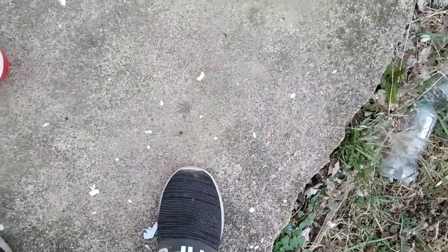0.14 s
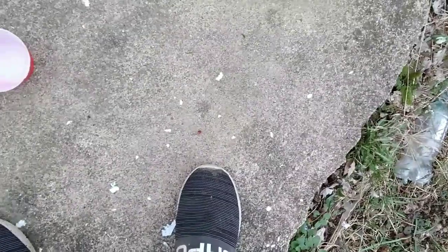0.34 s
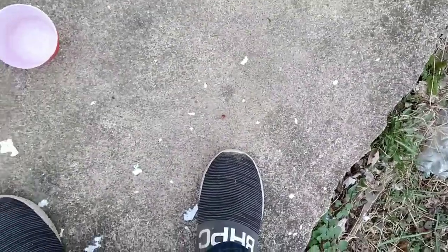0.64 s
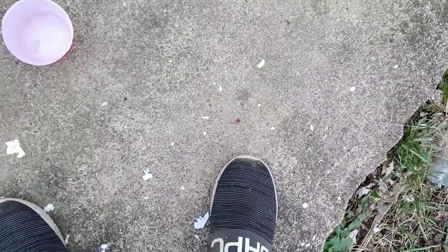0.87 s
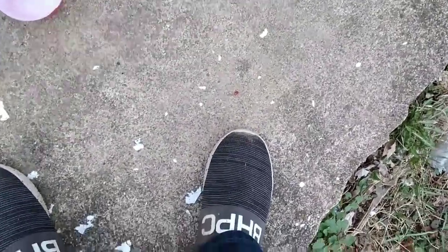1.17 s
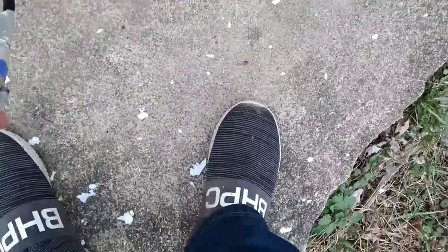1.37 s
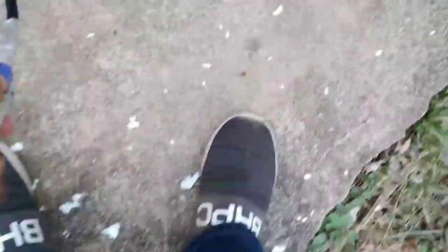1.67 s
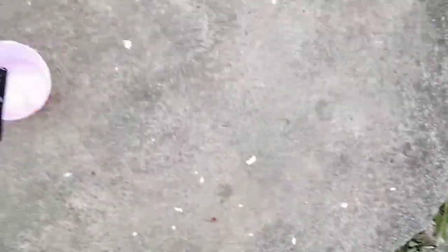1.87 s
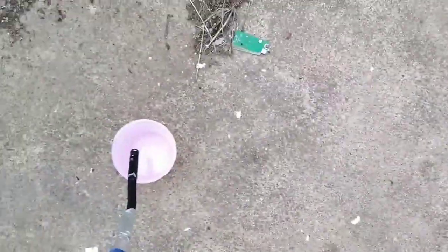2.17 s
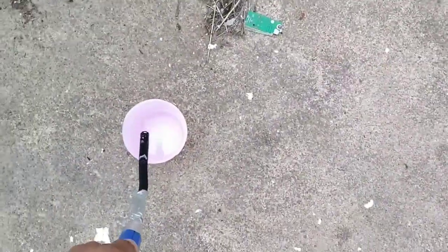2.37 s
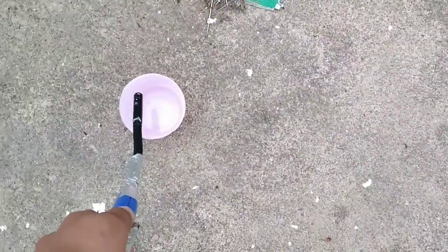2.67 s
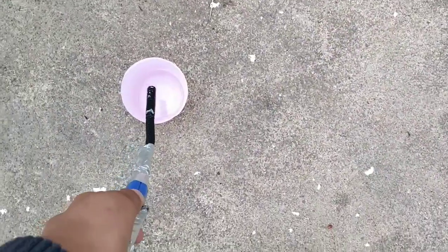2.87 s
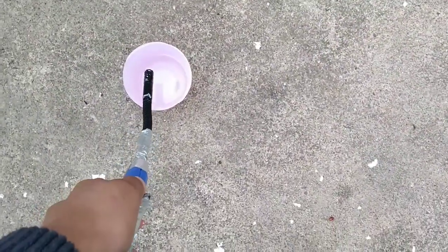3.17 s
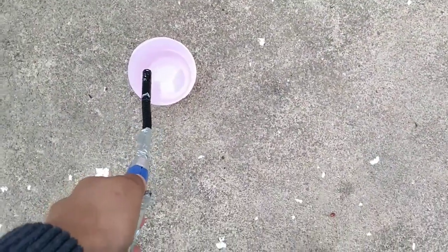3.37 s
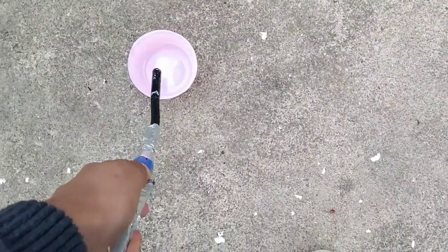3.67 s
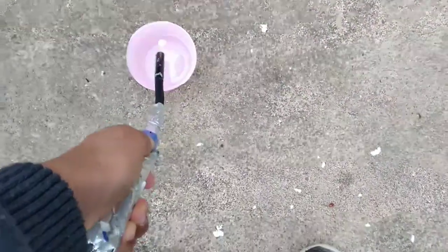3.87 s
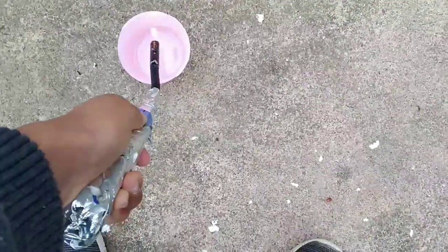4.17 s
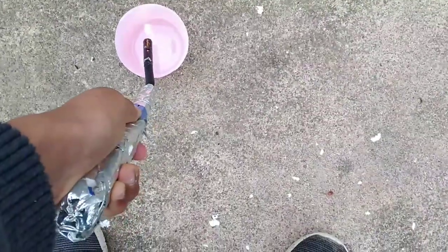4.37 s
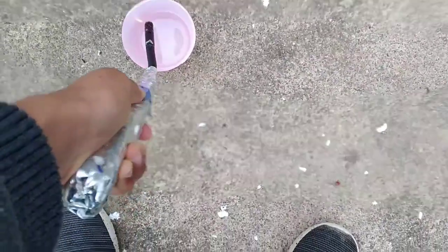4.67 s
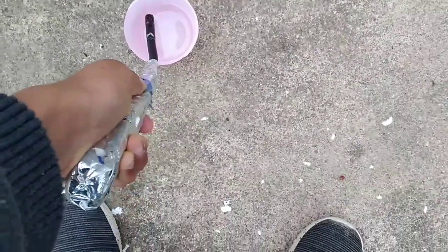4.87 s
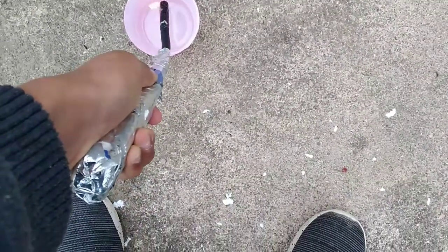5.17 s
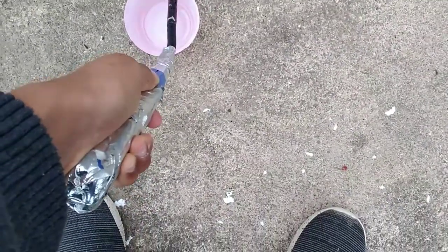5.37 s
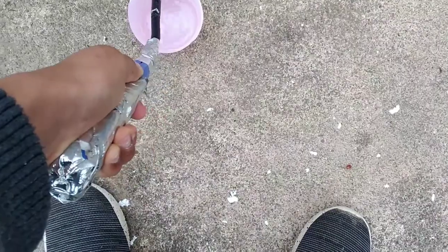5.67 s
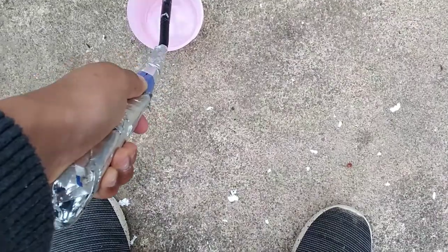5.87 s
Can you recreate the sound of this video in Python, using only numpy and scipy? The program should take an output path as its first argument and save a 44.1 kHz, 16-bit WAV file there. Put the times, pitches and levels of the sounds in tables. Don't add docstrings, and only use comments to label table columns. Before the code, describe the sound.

A close phone microphone in a paved yard between walls. From 0 s, low distant traffic rumbles under a soft car pass, strongest around 1 s and fading by about 3.5 s. Tiny ticks of trigger and foil appear, clearer near 1.1-1.3 s. At 1.5 s the igniter cracks hard and bright, with a brief metallic rattle and fluttering wall echoes; a weaker snap follows at 1.78 s, then light ticks around 1.9-2.0 s. The loudest snap comes at 2.42 s, repeated almost at once at 2.47 s. Trigger ticks lead to weak snaps at 2.98 and 3.11 s and a last strong one at 3.25 s. Dull little thumps of the jolted phone accompany several. Afterwards only faint rumble and barely audible insect and bird chirps remain, until dry foil crinkles from 5.54 to 5.8 s. The background is gated and muffled, the clicks crisp.

```python
import sys
import numpy as np
from scipy import signal
from scipy.fft import rfft, irfft, next_fast_len
from scipy.io import wavfile
from scipy.ndimage import uniform_filter1d, map_coordinates

SR = 44100
rng = np.random.default_rng(int(sys.argv[2]) if len(sys.argv) > 2 else 0)


def volts_from_decibels(level):
    exponent = np.asarray(level, float) / 20
    return 10 ** exponent


def store_pcm(level_fs):
    pcm = np.round(np.clip(level_fs, -1, 1) * 32767).astype(np.int16)
    wavfile.write(sys.argv[1], SR, np.atleast_2d(pcm).T)


N = 265923

# frequency in Hz, density in dB per Hz.
RUMBLE_HZ_DB = [(15, -56.5), (25, -34.5), (38, -19.5), (70, 0), (134, -3), (209, -5.5), (306, -11.5),
                (400, -28.5), (520, -57), (880, -120)]
DRONE_HZ_DB = [(150, -120), (250, -35), (380, 0), (550, -4.5), (720, -2.5), (900, -39), (1500, -120)]
ROAR_HZ_DB = [(300, -120), (600, -39), (740, -3), (900, 3), (1050, -3.5), (1300, -11.5), (1500, -47.5),
              (2500, -120)]
HISS_HZ_DB = [(600, -120), (1150, -33.5), (1400, 1.5), (2000, -6.5), (3000, -12), (4300, -28.5),
              (9000, -26.5), (11000, -46), (14000, -120)]
# frequency in Hz, density in dB per Hz.
STREET_HZ_DB = [(100, -100), (500, -99), (1000, -102), (2000, -108), (4000, -113), (8500, -113),
                (11000, -117), (14000, -122), (17000, -128)]
# time in seconds, exhaust level in dB, tyres in view in dB.
CAR = [(0, -62, -5), (.28, -64, -15), (.5, -57, -14), (.67, -54.5, -1), (.85, -50, -1.5), (1.09, -51, 2),
       (1.4, -58.5, -2.5), (1.7, -62, -1.5), (1.85, -55.5, 0.5), (2.12, -55, -6), (2.35, -61, -2.5),
       (2.57, -65.5, 8), (2.74, -62.5, 0.5), (3.07, -61.5, 7.5), (3.39, -67, 2.5), (3.63, -79, -2.5),
       (4.6, -72.5, -6.5), (4.9, -89.5, -4.5)]
# time in seconds, engine rumble in dB.
ROAD = [(0, -51.5), (.48, -44), (2.0, -48.5), (3.2, -54.5), (3.63, -47.5), (3.9, -48), (4.1, -52.5),
        (4.5, -52), (4.72, -50.5), (4.9, -52), (5.02, -49), (5.14, -53), (5.35, -48.5), (5.64, -47),
        (5.8, -47.5), (6.03, -47.5)]
# mean in dB, swing over the car's level in dB/dB, share of tyre view in dB/dB.
CAR_PARTS = [
    (-51.5, 0.42, 0.01),
    (-58, 1.01, 0.01),
    (-58, 0.67, 0.39),
    (-65, 0.44, 1.2),
]
# mean in dB, swing over the road's level in dB/dB.
ROAD_PARTS = [
    (-51, 0.69),
    (-89, 0.4),
    (-65.5, 1.6),
    (-81.5, 2.2),
]
CAR_MEAN_DB, ROAD_MEAN_DB = -58, -50
DRIFT_DB, DRIFT_PER_S = 1, 5.4

# start in seconds, peak in dB, rattle in
# ms, pitch in Hz, wall echo in dB.
TICKS = [(0.0024, -51, 1.9, 9200, 22), (0.908, -56, 10, 8440, 4), (1.1292, -40.5, 3.8, 7300, 19),
         (1.2612, -38.5, 4.3, 7200, 12.5), (1.714, -44, 0.99, 8770, 12), (1.7415, -30, 2, 4500, 18),
         (1.7445, -29, 1.9, 7500, 14), (1.8937, -42.5, 1.2, 7400, 11), (1.9064, -55, 2.2, 8370, 14),
         (1.9409, -45.5, 2.5, 8400, 13.5), (1.9768, -44.5, 3.7, 8370, 27), (1.9933, -33, 3.7, 7600, -5.5),
         (2.009, -40, 2.6, 8880, 7), (2.919, -41.5, 2.15, 5400, 25), (2.9506, -22.5, 2.1, 6940, 13.5),
         (3.0798, -28, 2, 7800, 10), (3.0831, -39, 2.5, 8260, -23), (3.1646, -32, 3.2, 7900, -4.5),
         (1.488, -34, 4, 7000, 0),
    (1.759, -40, 3, 7500, 0),
    (1.767, -31, 5, 8000, 0),
    (2.947, -37, 3, 5400, 0),
    (2.965, -42, 4, 7800, 0),
    (2.970, -36, 6, 7800, 0),
    (3.094, -44, 3, 8200, 0),
    (3.104, -38, 3, 8200, 0),
    (3.1125, -28, 3, 6500, 0),
    (2.4287, -18, .8, 8000, 0),
]
# start in seconds, peak in dB, rattle in ms, pitch in Hz, wall echo in dB.
GRIP = [
    (5.5408, -55.5, 3.2, 3020, 15),
    (5.5468, -37, 6.2, 5870, 22),
    (5.5565, -31.5, 3, 8200, 2),
    (5.626, -36, 3.5, 6800, 14.5),
    (5.634, -30, 1.7, 7080, -7),
    (5.7337, -53, 3.3, 6660, -7),
    (5.8116, -33, 2.8, 8800, 15.5),
]
# start in seconds, peak in dB, rattle in ms, pitch in Hz, wall echo in dB.
EDGE = [
    (.0024, -66, 3.2, 10500, 17),
    (.0885, -53.5, 4.2, 10500, 15.5),
    (.302, -53.5, 3, 9300, 19),
    (.873, -63.5, 3.4, 10500, 9),
    (1.2612, -54, 2, 13000, 11),
]
# frequency in Hz, level in dB.
CAPSULE_HZ_DB = [(1500, -27), (3000, -22.5), (4500, -11.5), (6500, -8), (8200, -1), (9500, -7.5),
                 (11500, -23.5), (13500, -30), (16000, -38)]
WRAP_HZ_DB = [(1290, -68), (2200, -40), (2950, -10), (3420, -23), (3870, -9.5), (7030, -2.5), (7590, 1),
              (12600, -32), (14000, -58)]
THIN_HZ_DB = [(3000, -45), (5500, -8), (7600, -3.5), (10500, -0.5), (12500, -12), (14500, -15),
              (16000, -32)]

# frequency in Hz, t60 in seconds.
YARD_HZ_T60_S = [(500, 0.39), (3000, 0.63), (6000, 0.68), (8500, 1), (11000, 0.19), (15000, 0.55)]
# frequency in Hz, level in dB.
WALLS_HZ_DB = [(500, -24), (3000, -23.5), (6000, -25), (8000, -22), (10000, -24), (13000, -18.5),
               (16000, -19)]
FLUTTER_S, RETURN_COUNT = .0143, 9
FIRST_RETURN_DB, FLUTTER_DB, RETURN_LOSS_DB = -18, -26.5, 5.5
FOIL_FLUTTER_DB = -9.5
ESCAPE_S, ESCAPE_DB = .27, 6

# frequency in Hz, density in dB per Hz.
CLOTH_HZ_DB = [(2000, -120), (3500, -9), (5000, -1.5), (8500, 0), (10500, -10.5), (13000, -120)]
RUSTLE_S, RUSTLE_ATTACK_S, RUSTLE_HOLD_S, RUSTLE_RELEASE_S = .15, 1.0, 0.54, 0.44
RUSTLE_DB, RUSTLE_REST_DB = -72, -87.5

# start in seconds, end in seconds, frequency in Hz, level in dB.
CHIRPS = [(0.45, 0.643, 2800, -96), (1.397, 1.467, 9100, -77), (2.166, 2.42, 9000, -85),
          (2.704, 2.895, 9100, -77), (3.561, 3.712, 1580, -71), (3.72, 4.098, 1850, -78.5),
          (3.801, 4.1, 8930, -82), (3.876, 3.941, 3920, -83), (4.356, 4.436, 3395, -81.5),
          (4.363, 4.412, 3984, -82), (5.25, 5.321, 3147, -85.5), (5.322, 5.534, 2966, -79),
          (5.553, 5.725, 3003, -74), (5.813, 5.93, 3170, -78.5)]

# start in seconds, peak in dB, rattle in ms, shell knock in dB, wall echo in dB.
SNAPS = [
    (1.492, -1, 2.06, -23.5, 2.5),
    (1.7769, -15, 2.45, -21.5, -3),
    (2.4206, 0, 1.85, -30, 0.5),
    (2.4736, -1, 1.8, -33.5, 0),
    (2.985, -12.5, 3.1, -21, 0),
    (3.1143, -19.5, 2.2, -22.5, 1.5),
    (3.2515, -2, 2.83, -31.5, 2.5),
]
# frequency in Hz, width in Hz, level in dB.
STEEL_MODES = [(3850, 260, -23), (4950, 220, -20), (5550, 260, -15), (6850, 220, -13), (7600, 240, -6),
               (8110, 270, 0), (8950, 240, -9), (9700, 240, -16), (13500, 500, -34)]
# frequency in Hz, width in Hz, level in dB.
SHELL_MODES = [(1480, 260, 6), (1850, 230, 1), (2920, 440, -1)]
CHATTER_S, CHATTER_DEPTH = .0015, .55

# start in seconds, level in dB, push in ms.
JOLTS = [
    (1.4935, -23.5, 2.4),
    (1.794, -27.5, 2.5),
    (2.475, -23.5, 3.07),
    (3.03, -38.5, 3.3),
    (3.253, -25, 4.7),
    (5.726, -37, 2.8),
]

# frequency in Hz, margin in dB.
MARGIN_HZ_DB = [(500, 4.4), (1500, 3.8), (3500, 4.2), (6000, 5.4), (12000, 7)]


def along(points, hz):
    f, v = np.transpose(points)
    return np.interp(np.log(hz + 1), np.log(f + 1), v)


def curve(rows):
    s, *cols = np.transpose(rows)
    return [np.interp(np.arange(N) / SR, s, c) for c in cols]


def wobble(knots_per_s):
    return map_coordinates(rng.standard_normal(200), [np.arange(N) * knots_per_s / SR])


def filtered(x, response):
    m = next_fast_len(N + SR // 2)
    return irfft(rfft(x, m) * response(np.fft.rfftfreq(m, 1 / SR)), m)[..., :N]


def ringing(modes):
    def response(f):
        total = 0
        for k, (hz, width_hz, db) in enumerate(modes):
            band = 1j * f * width_hz
            total = total + (-1) ** k * volts_from_decibels(db) * band / (hz * hz - f * f + band)
        return total
    return response


def causal(points):
    def response(f):
        cep = irfft(np.log(volts_from_decibels(along(points, f))))
        cep[1:len(cep) // 2] *= 2
        cep[len(cep) // 2 + 1:] = 0
        return np.exp(rfft(cep))
    return response


def rush(spectrum, patchy_db):
    z = signal.stft(rng.standard_normal(N), nperseg=1024)[2]
    field = uniform_filter1d(rng.standard_normal(z.shape), size=4, axis=0)
    field = uniform_filter1d(field, size=6, axis=1)
    patchy = signal.istft(z * volts_from_decibels(patchy_db * field / field.std()), nperseg=1024)[1][:N]
    x = filtered(patchy, lambda hz: volts_from_decibels(along(spectrum, hz)))
    return x / x.std()


def rattle(ms, t60, spiky_db):
    t = np.arange(SR // 25) / SR
    shape = (1 + 1.2 * np.exp(-t / .0003)) * volts_from_decibels(-60 * np.maximum(t - ms / 1000, 0) / t60)
    shape = np.hypot(shape, volts_from_decibels(-20 - 60 * t / .055))
    burst = shape * rng.standard_normal(len(t)) * volts_from_decibels(spiky_db * rng.standard_normal(len(t)))
    return burst * np.linalg.norm(shape) / np.linalg.norm(burst)


def add(track, s, burst):
    part = track[round(s * SR):][:len(burst)]
    part += burst[:len(part)]


def traffic():
    car_db, view_db = curve(CAR)
    road_db, = curve(ROAD)
    gains = []
    for (near_db, swing, share), (far_db, sway) in zip(CAR_PARTS, ROAD_PARTS):
        car = volts_from_decibels(near_db + swing * (car_db - CAR_MEAN_DB) + share * view_db)
        road = volts_from_decibels(far_db + sway * (road_db - ROAD_MEAN_DB))
        gains.append(np.hypot(car, road) * volts_from_decibels(DRIFT_DB * wobble(DRIFT_PER_S)))
    rumble, drone, roar, hiss = gains
    noise = rumble * rush(RUMBLE_HZ_DB, patchy_db=2.5) + drone * rush(DRONE_HZ_DB, patchy_db=4.0)
    noise += roar * rush(ROAR_HZ_DB, patchy_db=4) + hiss * rush(HISS_HZ_DB, patchy_db=4.5)
    air = filtered(rng.standard_normal(N), lambda hz: volts_from_decibels(along(STREET_HZ_DB, hz)) * np.sqrt(SR / 2))
    return noise + air


def foil(events, colour):
    near, far = np.zeros((2, N))
    for s, db, ms, hz, echo_db in events:
        burst = rattle(ms, t60=0.014, spiky_db=9.0)
        b, a = signal.iirpeak(min(hz, 15000), 3.5, SR)
        burst = volts_from_decibels(db - 4.0) * (1.1 * burst + 0.88 * signal.lfilter(b, a, burst))
        add(near, s, burst)
        add(far, s, volts_from_decibels(echo_db) * burst)
    return filtered(np.array([near, far]), causal(colour))


def yard(x, direct):
    t = np.arange(64) / SR
    smear = rng.standard_normal((RETURN_COUNT, 64)) * volts_from_decibels(-60 * t / 0.0004)
    flutter = np.zeros(SR // 4)
    for k, blur in enumerate(smear):
        db = FLUTTER_DB - RETURN_LOSS_DB * max(k - 3, 0) if k else FIRST_RETURN_DB
        add(flutter, (k + 1) * FLUTTER_S, volts_from_decibels(db) * blur / np.linalg.norm(blur))
    hz, _, (source, noise) = signal.stft(np.array([x, rng.standard_normal(N)]), SR, nperseg=256)
    frames = source.shape[1]
    t = np.arange(300) * 128 / SR
    loss_db = 120 * t / along(YARD_HZ_T60_S, hz)[:, None] + 2 * ESCAPE_DB * (t / ESCAPE_S) ** 3
    decay = volts_from_decibels(-loss_db) * (1 - np.exp(-t / 0.012)) ** 2
    decay *= volts_from_decibels(2 * along(WALLS_HZ_DB, hz))[:, None] / decay.sum(axis=1, keepdims=True)
    energy = uniform_filter1d(np.abs(source) ** 2, size=7, axis=0)
    energy = signal.fftconvolve(energy, decay, axes=1)[:, :frames]
    grain = np.repeat(rng.standard_normal((17, frames)), 8, axis=0)[:len(hz)]
    energy *= volts_from_decibels(3.8 * grain)
    tail = signal.istft(noise / np.abs(noise).std() / 2 * np.sqrt(np.abs(energy)), SR, nperseg=256)[1]
    return signal.fftconvolve(direct, flutter)[:N] + tail[:N]


def rustle():
    corners_s = np.cumsum([RUSTLE_S, RUSTLE_ATTACK_S, RUSTLE_HOLD_S, RUSTLE_RELEASE_S])
    level_db = np.interp(np.arange(N) / SR, corners_s, [RUSTLE_REST_DB, RUSTLE_DB, RUSTLE_DB, RUSTLE_REST_DB])
    return volts_from_decibels(level_db) * rush(CLOTH_HZ_DB, patchy_db=4.5)


def chirps():
    out = np.zeros(N)
    for start, end, hz, db in CHIRPS:
        t = np.arange(round((end - start) * SR)) / SR
        flicker = uniform_filter1d(rng.standard_normal((2, SR)), size=900, axis=1)[:, :len(t)]
        band = flicker[0] * np.sin(2 * np.pi * hz * t) + flicker[1] * np.cos(2 * np.pi * hz * t)
        add(out, start, volts_from_decibels(db) * signal.windows.tukey(len(t), .4) * band / band.std())
    return out


def igniter():
    blows, knocks, cracks = np.zeros((3, N))
    for s, db, ms, knock_db, echo_db in SNAPS:
        burst = rattle(ms, t60=.011, spiky_db=3)
        t = np.arange(len(burst)) / SR
        burst = burst * (1 + CHATTER_DEPTH * np.cos(2 * np.pi * t / CHATTER_S))
        add(blows, s + 0.00085, volts_from_decibels(db) * burst)
        add(knocks, s + 0.00092, volts_from_decibels(db + knock_db + 10) * burst)
        add(cracks, s + 0.00066, volts_from_decibels(db + echo_db) * rattle(0.75, t60=0.014, spiky_db=2))
    steel, click = ringing(STEEL_MODES), causal(CAPSULE_HZ_DB)
    bright = filtered(blows, lambda f: volts_from_decibels(4) * steel(f) + volts_from_decibels(2.0) * click(f))
    knock = filtered(knocks, ringing(SHELL_MODES))
    return bright + knock, filtered(cracks, click) + knock


def jolts():
    pushes = np.zeros(N)
    for s, db, ms in JOLTS:
        add(pushes, s, -volts_from_decibels(db + 7.5) * np.hanning(round(ms / 1000 * SR) + 2))
    return filtered(pushes, lambda f: ringing([(95, 130, 0)])(f) * 1j * f / (55 + 1j * f))


def scene():
    snap, crack = igniter()
    near, far = foil(TICKS, CAPSULE_HZ_DB) + foil(GRIP, WRAP_HZ_DB) + foil(EDGE, THIN_HZ_DB)
    echoes = yard(crack + far, crack + volts_from_decibels(FOIL_FLUTTER_DB) * far)
    return (snap + jolts() + near + echoes + rustle() + traffic() + chirps())[None]


def suppressor(x, steep, depth_db, hold):
    hz, _, z = signal.stft(x, SR, nperseg=512, noverlap=384)
    learnt = volts_from_decibels(2 * (along(STREET_HZ_DB, hz) + along(MARGIN_HZ_DB, hz))) * SR / 2 * 1.5 / 512
    power = np.abs(uniform_filter1d(np.abs(z) ** 2, size=9, axis=1, origin=3)) + 1e-20
    wanted = np.clip(steep * (1 - learnt[:, None] / power), 0, 1)
    gain = np.maximum(wanted, signal.lfilter([1 - hold], [1, -hold], wanted, axis=1))
    return signal.istft(z * np.maximum(gain, volts_from_decibels(depth_db)), SR, nperseg=512, noverlap=384)[1][:N]


def roll_off(x):
    return signal.sosfilt(signal.butter(12, 16590, fs=SR, output="sos"), x)


def record(dry):
    x = dry / (1 + np.abs(dry / .93) ** 4) ** (1 / 4)
    x = suppressor(x[0], steep=2.5, depth_db=-13, hold=.92)
    mix = filtered(x, lambda hz: volts_from_decibels(-np.maximum(hz - 15600, 0) / 25) * 1j * hz / (40 + 1j * hz))
    return roll_off(mix[None])


dry = scene()
out = record(dry)
store_pcm(out)
```